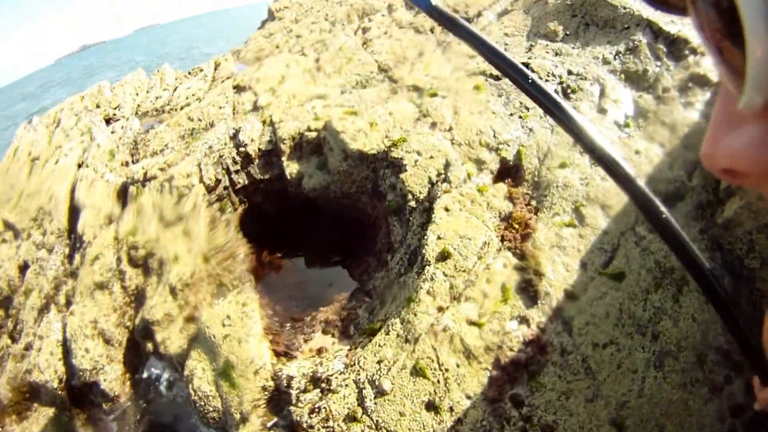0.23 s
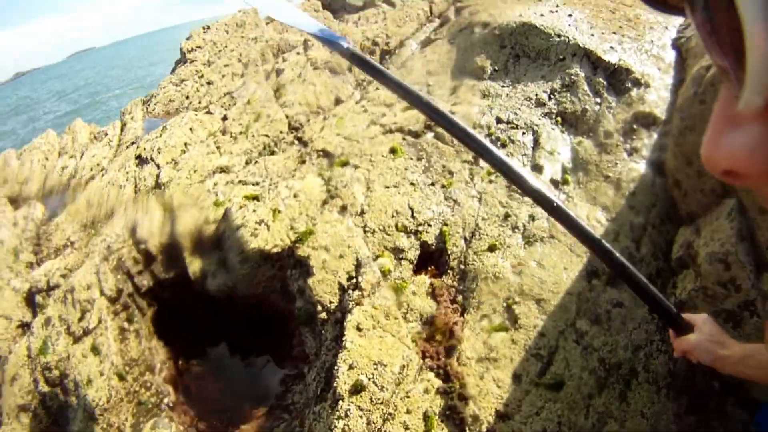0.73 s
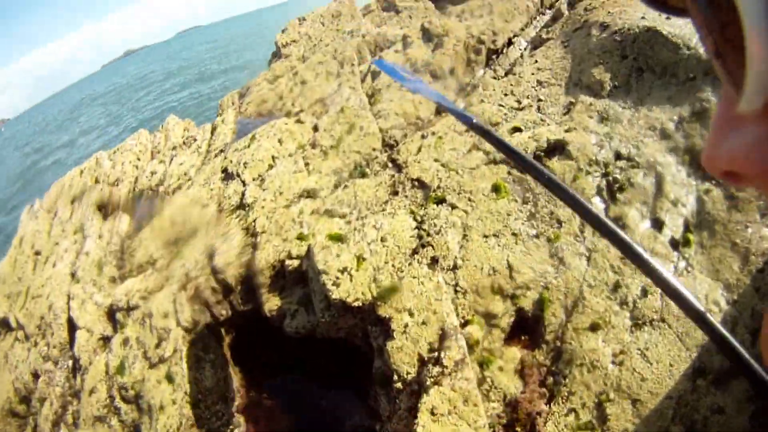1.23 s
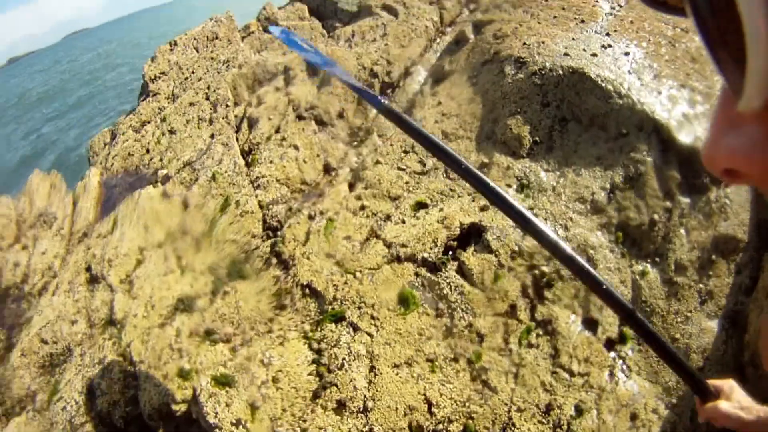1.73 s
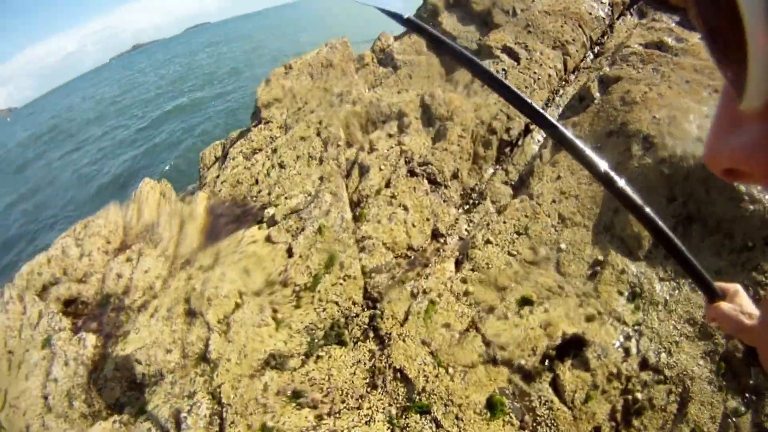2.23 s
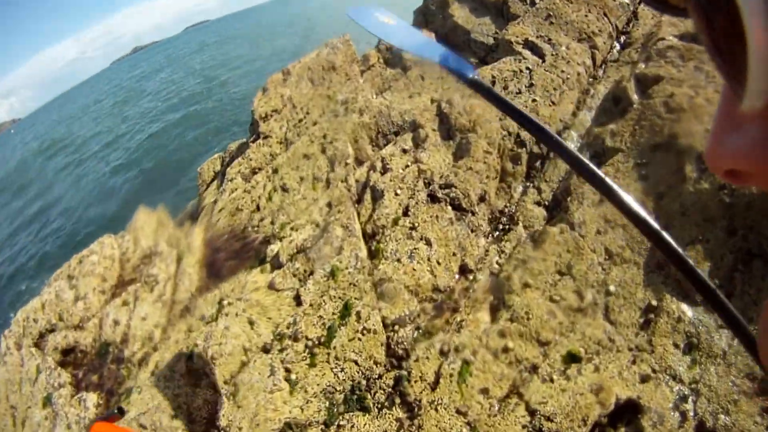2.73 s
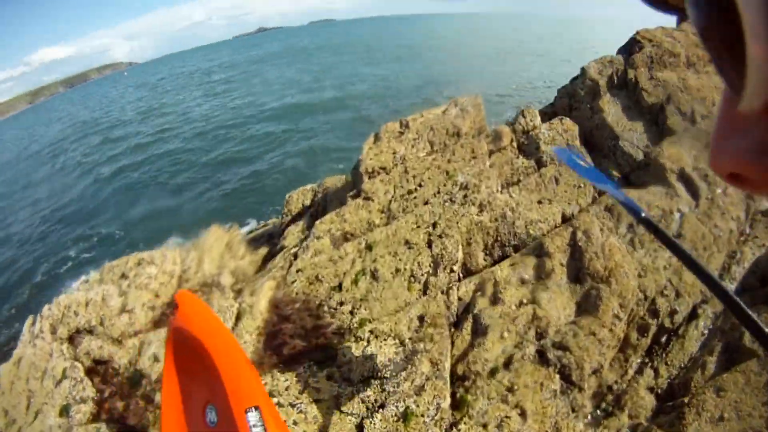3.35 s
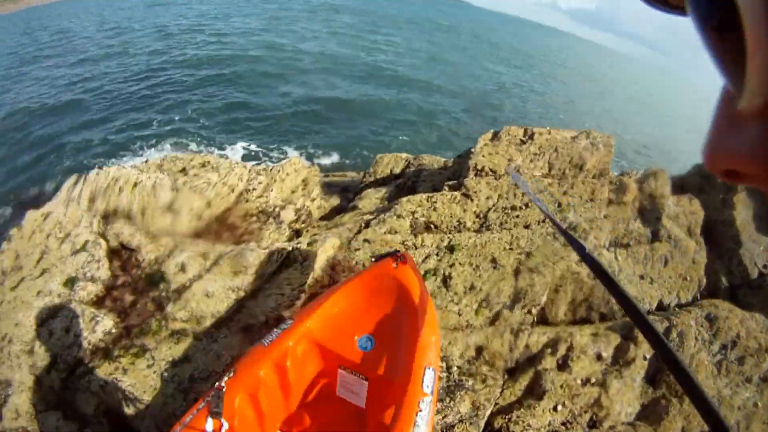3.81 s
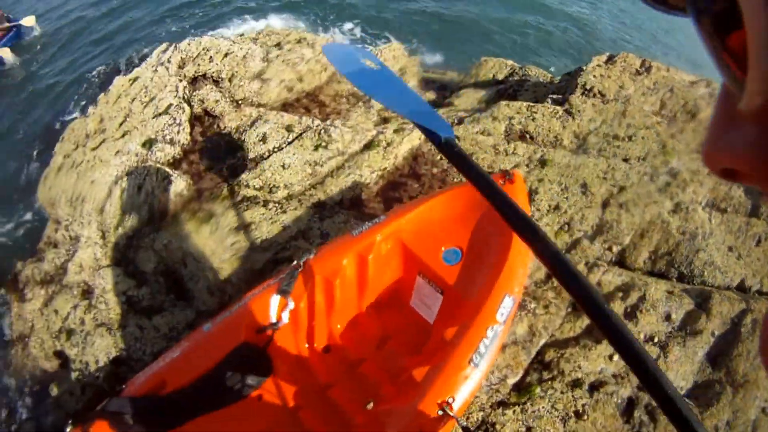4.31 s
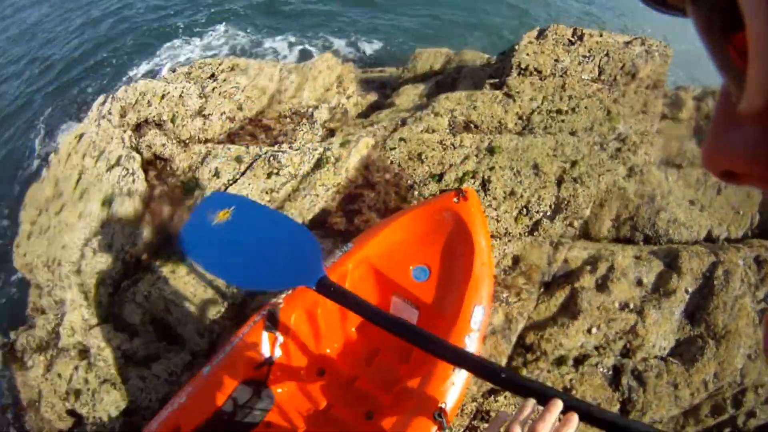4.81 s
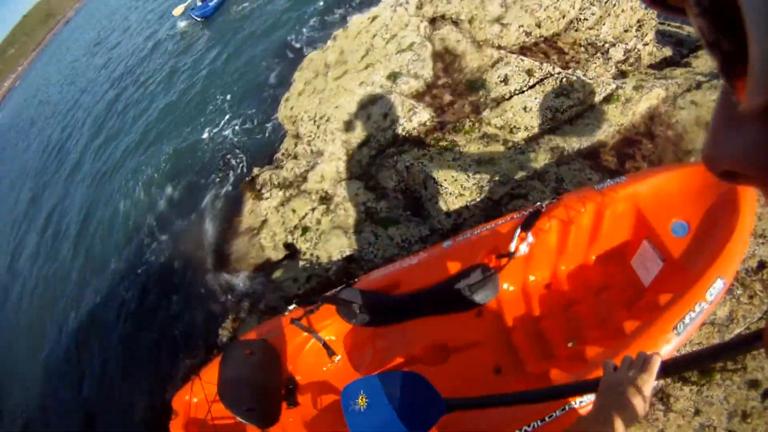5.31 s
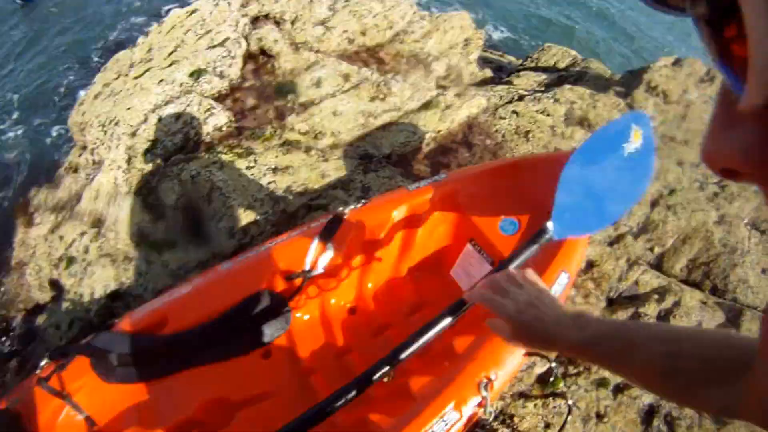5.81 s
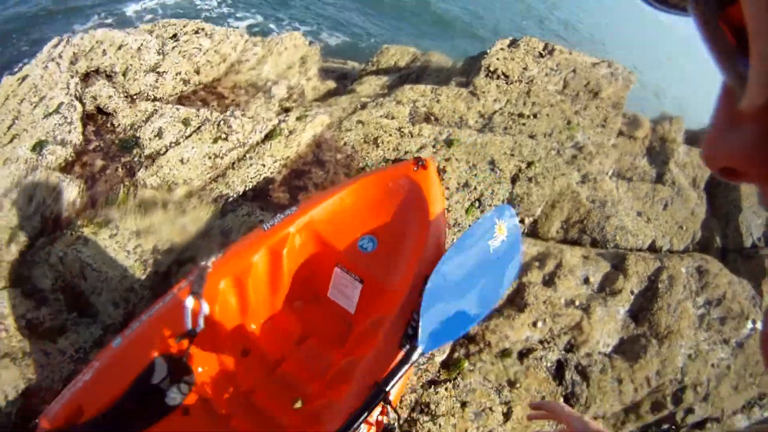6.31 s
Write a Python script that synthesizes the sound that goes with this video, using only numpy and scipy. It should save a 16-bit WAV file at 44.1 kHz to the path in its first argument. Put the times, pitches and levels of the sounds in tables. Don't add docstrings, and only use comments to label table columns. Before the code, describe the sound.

Sea wash hisses faintly behind wind rumble as a hollow plastic boat scrapes and thuds over rock, then a paddle clacks sharply on its deck.

```python
import sys
import numpy as np
from scipy import signal
from scipy.fft import rfft, irfft, next_fast_len
from scipy.io import wavfile
from scipy.ndimage import uniform_filter1d

SR = 44100
rng = np.random.default_rng(int(sys.argv[2]) if len(sys.argv) > 2 else 0)


def dump(signal):
    limited = np.clip(np.atleast_2d(signal).T, -1, 1)
    pcm = np.round(limited * 32767).astype(np.int16)
    wavfile.write(sys.argv[1], SR, pcm)


def field_ratio(decibels):
    return 10 ** (np.asarray(decibels, dtype=float) / 20)


N = 289737


def evened(x):
    return x / np.sqrt(np.mean(x ** 2) + 1e-20)


def steadied(x, size):
    return x / np.sqrt(uniform_filter1d(x ** 2, size=size) + 1e-12)


def peaked(x, db):
    return field_ratio(db) * x / np.sqrt(uniform_filter1d(x ** 2, size=200).max())


def curve(rows, column):
    rows = np.array(rows)
    return np.interp(np.arange(N) / SR, rows[:, 0], rows[:, column])


def swells(rows, floor_db, rise, fall):
    s, db, hold = np.transpose(rows)
    t = np.arange(0, N + 64, 64)[:, None] / SR
    before = np.maximum(s - t, 0)
    after = np.maximum(t - s - hold, 0)
    each = field_ratio(db - rise * before - fall * after)
    total = np.sqrt(field_ratio(floor_db) ** 2 + (each ** 2).sum(1))
    return np.interp(np.arange(N) / SR, t[:, 0], total)


def add(mix, s, sound):
    part = mix[round(s * SR):][:len(sound)]
    part += sound[:len(part)]


def tone(x, points):
    hz = np.fft.rfftfreq(N, 1 / SR)
    f, db = np.transpose(points)
    return irfft(rfft(x) * field_ratio(np.interp(np.log(hz + 1), np.log(f + 1), db)), N)


def highpass(x, hz):
    return signal.lfilter(*signal.butter(2, hz, "high", fs=SR), x)


def ring(x, modes, scatter_db=0., scatter=0.):
    size = next_fast_len(len(x) + 2000)
    hz = np.fft.rfftfreq(size, 1 / SR)[:, None]
    centre, width, db = np.transpose(modes)
    chance = rng.standard_normal((2, len(modes)))
    sign = (-1) ** np.arange(len(modes))
    detune = (hz - centre * (1 + scatter * chance[1])) / width
    poles = sign * field_ratio(db + scatter_db * chance[0]) / (1 + 2j * detune)
    return irfft(rfft(x, size) * poles.sum(1), size)[:len(x)]


def grit(per_s, spread_db):
    size = field_ratio(spread_db * np.minimum(rng.exponential(1, N), 4)) * rng.choice([-1, 1], N)
    return evened(size * (rng.random(N) < per_s / SR))


def rattle(rise, hold, t60, grain, strike=0.):
    t = np.arange(5000) / SR
    sizes = rng.exponential(1, 5000) ** grain + strike * np.exp(-t / 0.00072)
    contacts = rng.standard_normal(5000) * sizes
    return contacts * (1 - np.exp(-t / rise)) * field_ratio(-60 * np.maximum(t - hold, 0) / t60)


# (time [s], level [dB], share of grit [0-1])
WASH_LEVEL = [(0.0, -51.5, 0.1), (0.48, -49, 0.24), (0.97, -52.5, 0.54), (1.19, -49, 0.05),
              (1.34, -56.5, 0.73), (1.66, -54.5, 0.34), (1.99, -49, 0.3), (2.14, -53.5, 0.2),
              (2.76, -57, 0), (3.62, -56, 0.26), (3.82, -58.5, 0), (3.99, -53, 0.17), (4.2, -51.5, 0.7),
              (4.34, -58.5, 0.26), (5.62, -58, 0.4), (5.76, -57, 0.1), (6.08, -50, 0.46), (6.44, -58, 0.5)]
# (frequency [Hz], density [dB per Hz])
WASH_COLOUR = [(88, -13), (150, -7), (203, -7), (259, -9), (401, -2.5), (818, -6.5), (1060, -3.5),
               (1480, -3), (2200, 2.5), (3100, -1.5), (4960, -5), (5600, -6.5), (7280, -37), (12300, -120)]
# (frequency [Hz], width [Hz], level [dB])
CASE = [(1037, 22, -4), (2210, 470, 4), (3670, 120, -2.5), (4347, 134, 6.5), (5050, 120, -46)]
# (time [s], fizz level [dB])
TURN = [
    (3.5, 0.1),
    (3.75, -3.5),
]


def wash():
    frames = N // 128 + 5
    a, b, patches = rng.standard_normal((frames, 257, 3)).T
    patches = uniform_filter1d(patches, size=6, axis=0)
    patches = evened(uniform_filter1d(patches, size=12, axis=1))
    flicker = evened(uniform_filter1d(rng.standard_normal(frames), size=6))
    bins = (a + 1j * b) * field_ratio(1.4 * patches + 1.9 * flicker)
    hiss = signal.istft(bins, nperseg=512, noverlap=384)[1][:N]
    share = curve(WASH_LEVEL, 2)
    drive = np.sqrt(1 - share) * evened(hiss) + np.sqrt(share) * grit(900, spread_db=-2.0)
    coloured = tone(drive, WASH_COLOUR)
    fizz = tone(coloured, [(2600, -40), (3400, 0)])
    coloured = coloured + (field_ratio(curve(TURN, 1)) - 1) * fizz
    cased = coloured + field_ratio(2) * ring(coloured, CASE)
    return field_ratio(curve(WASH_LEVEL, 1) + 1.5) * evened(cased)


# (time [s], peak level [dB])
GUSTS = [(0.06, -43), (0.35, -43), (0.47, -46), (0.68, -42.5), (0.86, -35.5), (1.28, -35.5), (1.55, -43),
         (1.7, -41), (1.92, -32.5), (2.05, -45), (2.19, -48), (2.35, -35.5), (2.76, -43.5), (3.01, -36.5),
         (3.26, -38), (3.42, -31), (3.47, -33), (3.67, -38), (3.92, -37), (4.03, -39), (4.17, -45),
         (4.9, -45), (5.2, -47), (5.43, -39), (5.67, -37.5), (5.8, -35), (5.9, -39.5), (6.2, -50),
         (6.41, -40), (6.54, -33)]


def buffet():
    lumps = ring(ring(rng.standard_normal(N), [(26.1, 8.6, 0)]), [(28.6, 77, 0)])
    gain = swells([(*gust, 0) for gust in GUSTS], floor_db=-51.5, rise=267, fall=129)
    return gain * field_ratio(-2.0) * steadied(lumps, 5000)


# (time [s], peak level [dB], pitch [Hz], width [Hz], hold [s])
CHIRPS = [(.093, -41.5, 2900, 1300, 0.005), (.235, -42.5, 2280, 600, 0.024), (.30, -45, 2110, 200, 0.0079),
          (.505, -52, 1090, 80, 0.0072), (.655, -46, 1072, 73, 0.012), (.82, -52, 1306, 90, 0.045),
          (1.16, -53, 1340, 250, 0.096), (2.37, -45.5, 2700, 148, 0.0091), (2.955, -52, 5050, 250, 0.0044),
          (4.175, -46.5, 2460, 330, 0.07), (4.93, -55, 1094, 70, 0.015), (5.0, -59, 1090, 160, 0.08),
          (5.0, -61, 2200, 400, 0.09), (4.693, -31.5, 1200, 700, 0.014), (6.404, -43.5, 3500, 500, 0.0031)]


def chirp(db, hz, width, hold):
    mode = [(hz, width, 0)]
    drive = rattle(0.0013, hold, 0.019, grain=0.029)
    return peaked(ring(ring(drive, mode), mode), db)


# (frequency [Hz], width [Hz], level [dB])
HULL = [(89, 15.5, 6), (126.6, 26, 2), (180, 37, -0.5), (217.5, 22.3, 3.5), (267, 73, -3), (417, 93, -6),
        (650, 560, -14)]
# (time [s], drumming level [dB], hold [s])
BUMPS = [(0.86, -53.5, 0.024), (2.01, -46.5, 0.064), (2.14, -44.5, 0.0075), (2.23, -41.5, 0.021),
         (3.03, -51, 0.012), (3.19, -45.5, 0.15), (3.57, -43.5, 0.11), (3.75, -41, 0.1),
         (4.005, -34.5, 0.0064), (4.03, -41, 0.16), (4.54, -50, 0.067), (4.7, -47.5, 0.03),
         (4.9, -51, 0.0074), (5.69, -48, 0.034), (5.97, -38.5, 0.1), (6.14, -34, 0.0042), (6.21, -51, 0.1),
         (6.505, -47, 0.0047)]


def drumming():
    boom = ring(grit(260, spread_db=1.0), HULL)
    gain = swells(BUMPS, floor_db=-59, rise=461, fall=237)
    return gain * field_ratio(-3.0) * steadied(boom, 3000)


# (time [s], peak level [dB], pitch [Hz], slap against it [dB], t60 [s])
THUMPS = [(2.005, -46, 190, 2, 0.06), (2.122, -39, 113, 1, 0.038), (2.213, -38.5, 274, 0.5, 0.066),
          (2.24, -39, 252, -25, 0.035), (3.18, -40, 104, -4, 0.14), (3.284, -39, 150, -11, 0.052),
          (3.565, -32.5, 108, -7, 0.015), (3.747, -34, 97, -16, 0.067), (3.981, -25.5, 220, -16, 0.039),
          (3.9847, -32, 215, -25, 0.012), (3.195, -41, 171, -20, 0.073), (4.021, -34, 101, -22, 0.042),
          (4.522, -51, 349, -9, 0.099), (4.691, -37.5, 370, -9, 0.012), (5.683, -46, 198, 18.5, 0.029),
          (5.957, -32.5, 143, 14.5, 0.019), (5.965, -31, 170, 3, 0.077), (6.002, -35.5, 172, 7, 0.042),
          (6.117, -34, 168, 5.5, 0.067), (6.485, -34.5, 68, -1, 0.038), (1.915, -42, 81, -30, 0.071),
          (6.24, -44.5, 132, -30, 0.39), (6.486, -34, 206, -30, 0.025), (3.381, -25.5, 43, -35, 0.092),
          (2.309, -36.5, 40.4, -35, 0.083), (3.737, -36.5, 275, -12, 0.056), (6.499, -33.5, 60, -30, 0.11),
          (2.15, -45, 188, -20, 0.076)]


def thump(db, hz, slap_db, t60):
    t = np.arange(5000) / SR
    boom = np.sin(2 * np.pi * hz * t) * (1 - np.exp(-t / 0.0012)) * field_ratio(-60 * t / t60)
    slap = ring(rattle(0.0007, 0.0013, 0.035, grain=0.36), [(670, 300, 0.5), (1700, 1900, -10)])
    return peaked(boom, db + 0.057) + peaked(slap, db + slap_db - 8.5)


# (frequency [Hz], width [Hz], level [dB])
SHELL = [(1550, 16, 2.5), (2077, 94, 9.5), (2380, 394, 3.5), (2504, 87, 7.5), (2930, 120, -6.5)]
WALL = [(500, 190, -9), (744, 1200, -30), (1090, 170, 4), (1080, 31, 15.5), (1220, 1200, -2)]
EDGE = [(3740, 370, 2), (4470, 170, 4), (5000, 610, -2), (3360, 880, 0), (4100, 2100, -7.5),
        (5850, 150, -10.5)]


def knock(shell_db, wall_db, edge_db, hold, t60):
    drive = rattle(0.00031, hold, t60, grain=1.0, strike=2.4)
    damping = [1, 2.6, 1]
    shell = ring(drive, np.multiply(SHELL, damping), 2.2, 0.015)
    edge = ring(drive, np.multiply(EDGE, damping), 2.2, 0.015)
    wall = ring(drive, WALL, 6.1, 0.0041)
    sound = peaked(shell, shell_db - 7.0)
    sound += peaked(wall, shell_db + wall_db - 10.5)
    return sound + peaked(edge, shell_db + edge_db - 0.5)


# (time [s], shell peak level [dB], walls against it [dB], edge against it [dB], t60 [s])
PULL = [(3.0036, -37, -5.5, -6.5, 0.15), (3.059, -51, 4, 1.5, 0.082), (3.1602, -53, -1, 5, 0.11),
        (3.1785, -41, -7, -15, 0.079), (3.2545, -36.5, -2, -5.5, 0.083), (3.3755, -43, 2, -3, 0.066),
        (3.4511, -49.5, 7, -10, 0.12), (3.5107, -41.5, -15, -11, 0.034), (3.5616, -35.5, -6, -6, 0.17),
        (3.5842, -42.5, 5, -1, 0.1), (3.6282, -37.5, -16, -7, 0.036), (3.6473, -45, 1, -32, 0.12),
        (3.739, -35, -24, -3.5, 0.12), (3.743, -32.5, -9, -4.5, 0.11), (3.7635, -33, 0, -13, 0.1),
        (3.805, -39.5, -7, -7, .15), (3.822, -38.5, -11, -7, 0.17), (3.838, -38.5, 2, -14, 0.17),
        (3.8532, -33, 9.5, -28, 0.038), (3.8982, -38.5, -3, -4.5, 0.016)]
SETTLE = [(3.9834, -29.5, 2, -21, 0.086), (3.9959, -30.5, -27, -8.5, 0.042), (4.019, -35, -12, -31, 0.15),
          (4.065, -26.5, -6, -5, 0.038), (4.076, -29.5, -3, -29, 0.088), (4.0942, -24.5, -0.5, -13, 0.035),
          (4.116, -33.5, 3, -26, 0.035), (4.1384, -35, 1.5, -36, 0.28), (4.164, -33, 4, -41, 0.024),
          (4.2763, -42.5, 1.5, -10, 0.12), (4.3202, -39, 2, -3.5, 0.054), (4.348, -48, 2, -8, 0.14),
          (4.376, -47, 0, -7, 0.059), (4.5226, -40.5, 7, -11, 0.05), (4.5961, -45.5, 5.5, -27, 0.31),
          (4.7176, -41.5, 6.5, -27, 0.14), (4.74, -45.5, 1.5, -29, 0.092)]


def rasp(shell_db, wall_db, edge_db, t60):
    slide_s = 0.0013 + 0.094 * t60
    return knock(shell_db, wall_db, edge_db, slide_s, t60)


# (time [s], shell peak level [dB], t60 [s])
NUDGES = [(0.1464, -40.5, 0.31), (0.2094, -37.5, 0.25), (0.3973, -41.5, 0.075), (0.487, -40, 0.068),
          (0.5998, -38.5, 0.24), (1.3304, -42.5, 0.12), (1.399, -44, 0.023), (1.773, -38, 0.087),
          (2.0187, -48, 0.056), (2.1246, -41, 0.044), (2.2159, -33, 0.029), (2.381, -42.5, 0.058),
          (2.6995, -42, 0.035), (2.9214, -46, 0.036)]


def nudge(db, t60):
    return rasp(db, wall_db=-39, edge_db=-9, t60=t60)


# (time [s], peak level [dB], pitch [Hz], width [Hz], contact [s])
PINGS = [(4.692, -34.5, 1570, 500, 0.015), (4.692, -44, 600, 500, 0.0088), (4.524, -42, 1310, 300, 0.015),
         (3.986, -42, 4160, 1500, .004), (4.022, -38, 4300, 1200, .004), (5.684, -45, 334, 200, 0.0088),
         (1.015, -50, 5000, 500, .004), (3.257, -43.5, 2000, 300, 0.012), (2.38, -50.5, 920, 200, 0.069),
         (2.8, -49.5, 340, 300, 0.018), (2.89, -51.5, 380, 400, 0.055), (3.75, -42, 3440, 250, 0.0079),
         (3.854, -32.5, 5000, 700, .004), (3.858, -37.5, 1620, 500, 0.0098), (4.066, -36, 4050, 700, .004),
         (4.068, -29, 2360, 250, 0.0091), (4.076, -31, 1620, 250, 0.012), (4.0945, -31, 4270, 600, 0.0028),
         (4.113, -42, 4550, 900, .003), (5.537, -37, 4800, 700, 0.0017), (5.689, -37, 1320, 350, 0.0081),
         (5.738, -35, 5400, 400, .004), (5.9215, -32, 5050, 300, 0.0046), (5.946, -37, 3770, 300, .005),
         (5.957, -35, 456, 250, 0.022), (5.97, -28, 1740, 500, 0.024), (6.041, -25.5, 3330, 900, 0.0064),
         (6.076, -29.5, 3740, 150, 0.0048), (6.211, -49, 3500, 350, .003),
         (6.233, -38.5, 3750, 500, 0.0035), (6.261, -29, 4300, 300, 0.0042),
         (6.261, -25, 3360, 300, 0.0035), (6.271, -34.5, 1840, 250, 0.015), (6.344, -45, 1700, 200, 0.017),
         (4.634, -35, 4900, 900, 0.003), (3.563, -41.5, 477, 350, 0.013), (6.366, -44, 2100, 250, .006),
         (6.485, -38.5, 956, 300, 0.0016)]


def ping(db, hz, width, contact):
    mode = [(hz, width, 0)]
    drive = rattle(0.00022, 0.0005, 6.6 * contact, grain=0.42, strike=2.3)
    return peaked(ring(ring(drive, mode), mode), db - 2.5)


# (time [s], peak level [dB], pitch [Hz], t60 [s])
TAPS = [(3.8545, -29, 1520, .016), (4.0665, -25, 2400, .02), (4.0774, -27, 1600, .02),
        (4.0946, -21, 2670, .016), (4.1655, -32, 1580, .016), (4.3206, -36, 2570, .014),
        (4.634, -28, 4900, .012), (4.6915, -19, 2550, .02), (5.5372, -27, 2550, .02),
        (5.5545, -31, 2400, .022), (5.655, -27, 2450, .02), (5.663, -30, 2520, .016),
        (5.6744, -28, 2470, .02), (5.6846, -25, 2520, .018), (5.69, -28, 2450, .016),
        (5.6954, -29, 2550, .016), (5.7267, -35, 3300, .016), (5.7389, -25, 2700, .016),
        (5.8115, -20, 2650, .018), (5.8164, -28, 2500, .025), (5.8591, -34, 2500, .016),
        (5.8942, -31, 3880, .01), (5.9219, -26, 5000, .016), (5.9484, -30, 3930, .012),
        (5.9648, -18, 3740, .01), (5.9655, -19, 1910, .014), (5.971, -23, 1760, .016),
        (6.0154, -27, 1500, .012), (6.0397, -20, 3300, .012), (6.0433, -21, 1980, .016),
        (6.119, -24, 2640, .016), (6.234, -28, 3700, .01), (6.236, -33, 1800, .014),
        (6.2612, -19, 3330, .014), (6.2664, -23, 3650, .02), (6.268, -30, 2550, .04),
        (6.353, -35, 2750, .03), (6.3649, -32, 3700, .014), (6.4048, -38, 3450, .014)]
KNOCKS = [(2.228, -42, 185, .04), (2.252, -43, 310, .04), (4.096, -29, 1100, .04),
          (5.9546, -20, 1080, .028), (5.9544, -18, 2300, .005), (5.955, -32, 780, .03),
          (5.956, -34, 460, .03), (6.008, -38, 1270, .05), (6.05, -42, 500, .03), (6.12, -36, 720, .03),
          (6.125, -36, 1090, .07), (6.128, -38, 330, .04), (6.24, -40, 1120, .025), (6.27, -41, 1290, .05),
          (6.4853, -30, 940, .018), (6.4862, -35, 640, .022), (6.4857, -35, 360, .02),
          (6.4856, -40, 1900, .01), (6.4858, -43, 2600, .008)]


def tap(db, hz, t60):
    t = np.arange(4000) / SR
    pair = np.sin(2 * np.pi * hz * t) + 0.4 * np.sin(2 * np.pi * 1.13 * hz * t)
    return field_ratio(db - 1.5 - 60 * t / t60) * (1 - np.exp(-t / 0.00025)) * pair


# (factor on blade pitch, relative width, level [dB])
BLADE = [(1.026, 0.03, 5.5), (0.72, 0.035, 3), (1.3, 0.047, 1), (0.525, 0.016, -5), (1.245, 0.48, -4.5),
         (1.33, 0.48, -12)]
# (frequency [Hz], width [Hz], level [dB])
SHAFT = [(1088, 18, 0), (975, 70, -13), (1290, 120, -14)]


def clack(blade_db, blade_hz, shaft_db, edge_db, t60):
    drive = rattle(0.0003, 0.001, t60, grain=0.8, strike=3.2)
    blade = ring(drive, np.multiply(BLADE, [blade_hz, blade_hz, 1]), 1.5, 0.01)
    blade = highpass(blade, 0.45 * blade_hz)
    first_contacts = drive * field_ratio(-60 * np.arange(len(drive)) / SR / 0.05)
    shaft = ring(first_contacts, SHAFT, 1.2, 0.002)
    edge = highpass(ring(drive, EDGE, 2.8, 0.0097), 2000)
    sound = peaked(blade, blade_db - 11.5)
    sound += peaked(shaft, blade_db + shaft_db - 5.0)
    return sound + peaked(edge, blade_db + edge_db - 10.0)


# (time [s], blade peak level [dB], blade pitch [Hz], edge against it [dB], t60 [s])
ROCKING = [(4.6328, -25.5, 2620, -0.5, 0.048), (4.6907, -11, 2280, -11.5, 0.031),
           (6.0789, -22, 1890, -4, 0.038), (5.8932, -32, 2600, 2.5, 0.048), (5.922, -22, 2030, 1, 0.05),
           (5.946, -20, 2700, -13, 0.11), (6.226, -23.5, 3200, -24, 0.085), (6.241, -27, 2570, -13, 0.039),
           (6.2609, -17, 2990, -5, 0.038), (6.2775, -33, 2620, -30, 0.19), (6.3348, -34, 1770, -23, 0.18),
           (6.353, -25.5, 2880, -16, 0.076), (6.3646, -32, 2020, -24, 0.058),
           (6.396, -40.5, 1750, -9, 0.25)]


def rock(db, hz, edge_db, t60):
    return clack(db, hz, -30, edge_db, t60)


# (time [s], blade peak level [dB], blade pitch [Hz], shaft against it [dB], t60 [s])
CLACKS = [(5.5367, -33, 2460, -34, 0.11), (5.554, -30, 2420, -21, 0.11), (5.6141, -29.5, 2640, -19, 0.039),
          (5.654, -26.5, 2410, -17, 0.17), (5.6742, -25, 2500, -15, 0.016),
          (5.6838, -18.5, 2420, -18.5, 0.052), (5.7105, -32, 2500, -15, 0.3),
          (5.7389, -18.5, 2620, -17.5, 0.093), (5.7691, -33, 2410, -13.5, 0.099),
          (5.8114, -23, 2780, -21, 0.083), (5.8332, -32, 2100, -10.5, 0.13),
          (5.8585, -27.5, 2650, -19, 0.036), (5.9541, -19, 1830, -1, 0.063),
          (5.9649, -12, 2170, -26, 0.047), (6.0024, -17.5, 2440, -7, 0.079),
          (6.0397, -18.5, 2050, -24, 0.074), (6.119, -18.5, 2400, -15, 0.028),
          (6.1357, -26.5, 2020, -6.5, 0.077), (6.1496, -24.5, 2210, -30, 0.063)]


def lay(db, hz, shaft_db, t60):
    edge_db = -7 - 15.5 * (hz - 2420) / 1e3
    return clack(db, hz, shaft_db, edge_db, t60)


def scene():
    mix = wash() + buffet() + drumming()
    for table, source in ((CHIRPS, chirp), (THUMPS, thump), (PULL, rasp), (SETTLE, rasp), (NUDGES, nudge),
                          (PINGS, ping), (TAPS, tap), (KNOCKS, tap), (ROCKING, rock), (CLACKS, lay)):
        for s, *blow in table:
            add(mix, s, source(*blow))
    return mix[None]


def band_limit(x):
    return signal.sosfilt(signal.butter(12, 16460, fs=SR, output="sos"), x)


# (frequency [Hz], level [dB])
PORT = [(2700, -1), (2950, -0.5), (3120, -7), (3300, -2), (5150, 0.5), (5400, -3.5), (5600, 1)]
# (frequency [Hz], level [dB])
BAND_LIMIT = [(14800, 0), (15150, 1), (15350, -32), (16000, -39), (16500, -50)]


def record(dry):
    guard = signal.firwin(81, 5803, fs=SR)[None]
    guarded = signal.oaconvolve(tone(dry, PORT), guard, "same")
    slow = signal.resample_poly(guarded, 40, 147, axis=1)
    held = np.repeat(slow, 4, axis=1)
    held = signal.resample_poly(held, 147, 160, axis=1)
    held = np.pad(held, ((0, 0), (0, 64)))[:, :N]
    return band_limit(tone(held, BAND_LIMIT))


dry = scene()
out = record(dry)
dump(out)
```